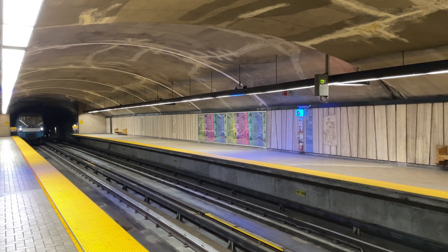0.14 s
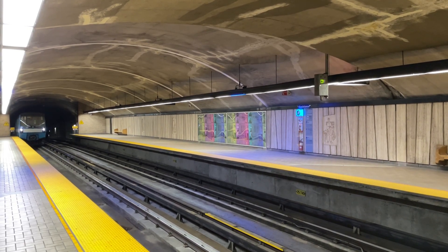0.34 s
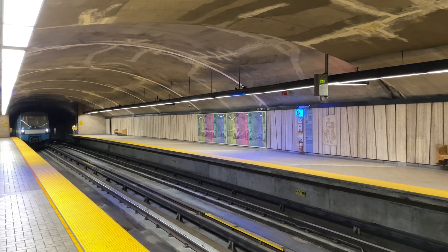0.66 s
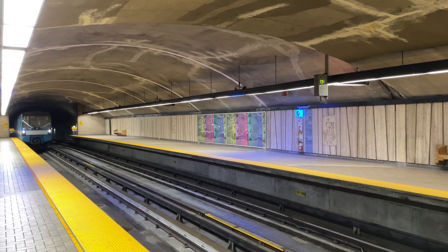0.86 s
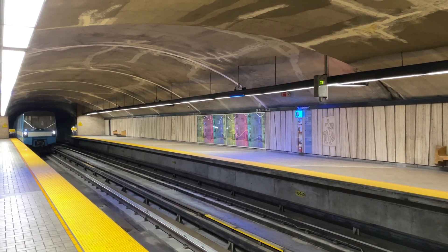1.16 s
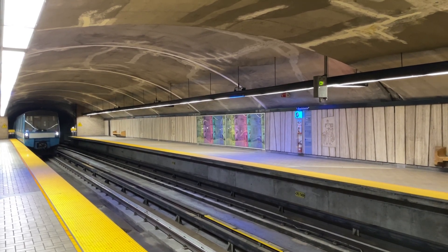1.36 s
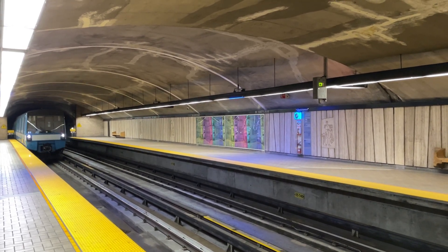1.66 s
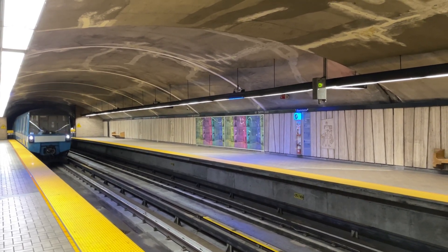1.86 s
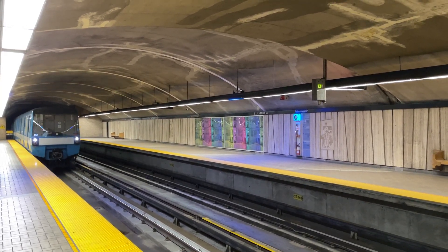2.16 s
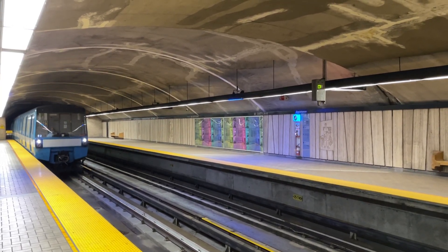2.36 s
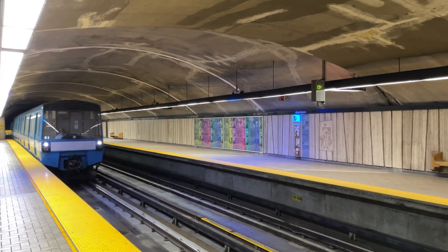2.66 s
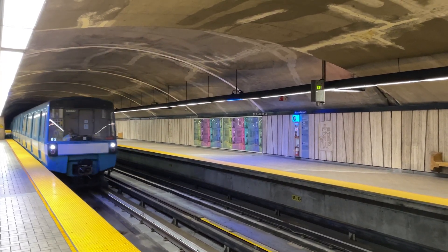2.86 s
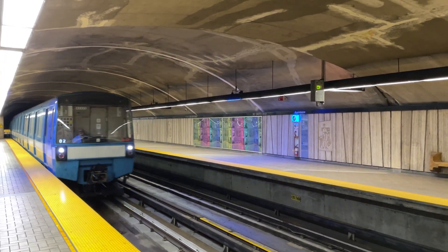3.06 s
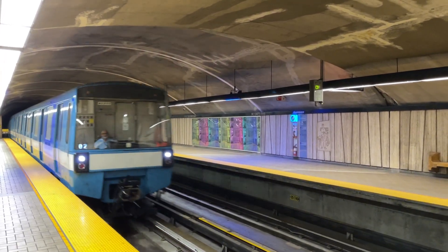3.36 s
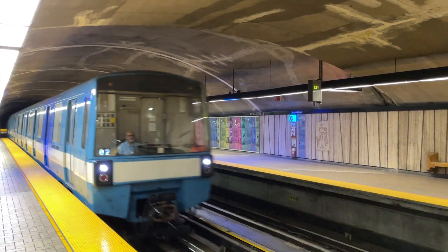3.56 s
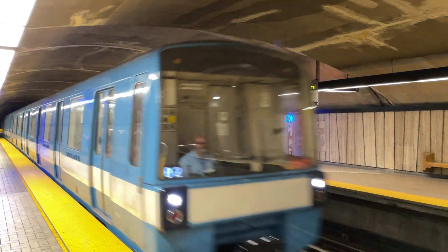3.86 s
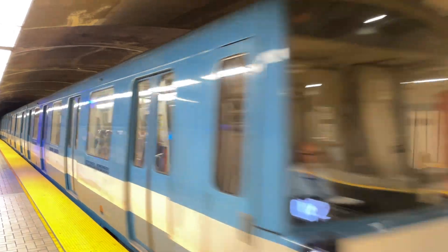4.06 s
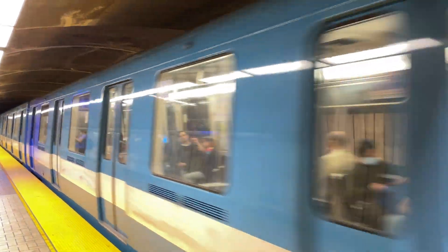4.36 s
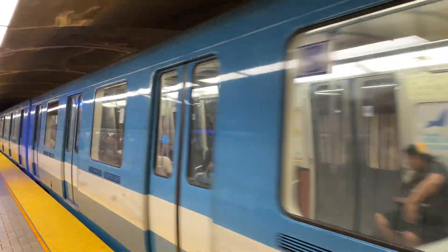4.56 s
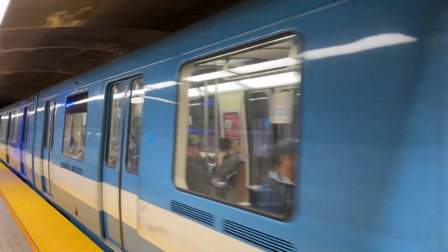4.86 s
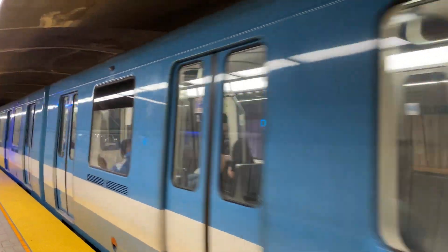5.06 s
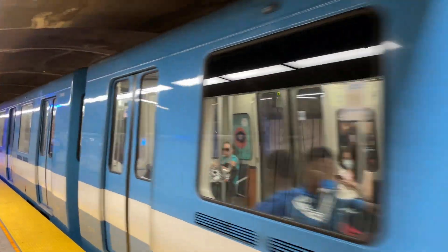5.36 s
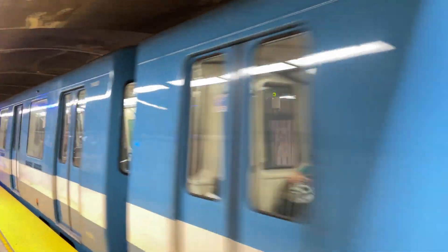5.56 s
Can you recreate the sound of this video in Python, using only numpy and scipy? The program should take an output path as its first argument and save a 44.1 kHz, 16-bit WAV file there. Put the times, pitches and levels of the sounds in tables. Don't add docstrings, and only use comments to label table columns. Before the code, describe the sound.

An underground station with a hard concrete vault, heard from a stereo microphone on the platform. From 0 s a deep ground rumble and a wide, rough tyre roar come from the tunnel mouth, already loud, with soft tonal hums blurred inside the noise. Over the first two seconds the roar opens up slightly as the train leaves the tunnel, while tread hiss and a thin, high scraping sizzle grow with nearness. At about 4 s the front draws level: car sides slightly dull the running gear, the low part widens, and sparse tiny bright snaps begin. Bogies and gaps pass with gentle swells near 4.5, 5.3 and 5.55 s. Low wind buffets hit the microphone: a longer one around 5 s, three short hard thumps between 5.25 and 5.45 s, a weak one near 5.65 s. The roar continues to the end, with no squeal or stop.

```python
import sys
import numpy as np
from scipy import signal
from scipy.fft import rfft, irfft, next_fast_len
from scipy.io import wavfile
from scipy.ndimage import uniform_filter1d

SR = 44100
rng = np.random.default_rng(int(sys.argv[2]) if len(sys.argv) > 2 else 0)


def undo_db(level):
    steps = np.asarray(level, float) / 20
    return 10 ** steps


def to_wav(sig):
    pcm = np.clip(np.atleast_2d(sig), -1, 1) * 32767
    pcm = np.round(pcm).astype(np.int16)
    wavfile.write(sys.argv[1], SR, pcm.T)


N = 251811
SIZE = next_fast_len(N)
TIME = np.arange(N) / SR
START_M, LEVEL_S = 62, 3.96


def approach():
    leave_s, cover_s = 0.66, 0.12
    metres = START_M * np.maximum(1 - TIME / LEVEL_S, 0)
    inside = np.exp(-TIME / leave_s)
    hidden = 0.5 + 0.5 * np.tanh((TIME - LEVEL_S) / cover_s)
    return metres, inside, hidden


def heard_db(level_db, mouth_db, air_db, screen_db, column):
    # middle in seconds, length in seconds,
    # gain of low sound (column 2) in dB, gain of high sound (column 3) in dB.
    openings = [
        (4.497, 0.2, 0.6, 0.3),
        (5.303, 0.11, 1, 0.5),
        (5.555, 0.13, .5, 0.7),
    ]
    metres, inside, hidden = approach()
    through_db = sum(row[column] * np.exp(-((TIME - row[0]) / row[1]) ** 2) for row in openings)
    return level_db - mouth_db * inside - air_db * metres / 100 - screen_db * hidden + through_db


def rms_one(x):
    return x / np.sqrt(np.mean(x ** 2) + 1e-20)


def at_hz(points, column=1, scale=np.log):
    points = np.array(points)
    hz = np.maximum(np.arange(SIZE // 2 + 1) * SR / SIZE, 1)
    return np.interp(scale(hz), scale(points[:, 0]), points[:, column])


def slow_noise(noise, pole):
    return signal.lfilter([1], [1, -2 * pole, pole * pole], noise)[..., 2000:]


def drift(rate):
    pole = np.exp(-80 * np.pi * rate / SR)
    slow = slow_noise(rng.standard_normal(N // 40 + 2002), pole)
    return np.interp(np.arange(N) / 40, np.arange(len(slow)), rms_one(slow))


def field(spectrum, flicker_db, rate):
    closed = [*spectrum, (2 * spectrum[-1][0], -140)]
    gain = undo_db(at_hz(closed))
    gain[0] = 0
    white = rfft(rng.standard_normal((2, SIZE)))
    coloured = irfft(gain * white, SIZE)[:, :N]
    return rms_one(coloured) * undo_db(flicker_db * drift(rate))


def ground_rumble():
    # frequency in Hz, density in dB per Hz.
    ground_colour = [(11, -49), (18, -31), (65, -0.5), (160, -2), (210, -20), (350, -120)]
    ground_db = heard_db(-27, mouth_db=-3.5, air_db=3, screen_db=-0.1, column=2)
    return undo_db(ground_db + 0.6) * field(ground_colour, flicker_db=1.7, rate=6.3)


def carcass_roar(roar_db):
    # frequency in Hz, density in dB per Hz.
    carcass_colour = [(70, -26), (120, -3), (200, -3.5), (320, -3.5), (480, -3), (620, -8), (900, -39)]
    return undo_db(roar_db - 2.5) * field(carcass_colour, flicker_db=0.3, rate=2.3)


def tread_roar(tread_db):
    # frequency in Hz, density in dB per Hz.
    tread_colour = [(380, -41), (540, -4), (650, -1.5), (900, -0.5), (1400, -5), (2000, -10.5),
                    (2600, -19.5), (3600, -69)]
    return undo_db(tread_db - 2.0) * field(tread_colour, flicker_db=0.56, rate=4.2)


def tyre_resonances(roar_db, tread_db):
    # first pitch in Hz, last pitch in Hz, width in Hz, level far off in dB, level alongside in dB.
    resonances = [(135.2, 125, 56, -35, -46), (179.2, 150, 38, -25.5, -54), (267.5, 252, 47, -27, -27.5),
                  (392.3, 355, 43, -25, -32), (446.6, 470, 66, -26.5, -34), (661.5, 640, 30, -36, -32.5),
                  (736.4, 725, 49, -27.5, -29.5), (871, 800, 107, -31.5, -33),
                  (961, 1090, 120, -40.5, -34.5), (1360, 1400, 134, -35.5, -39),
                  (1696, 1800, 260, -39.5, -37)]
    out = np.zeros((2, N))
    remoteness = approach()[0] / START_M
    for first_hz, last_hz, width_hz, far_db, near_db in resonances:
        noise = rng.standard_normal((2, N + 2000)) + 1j * rng.standard_normal((2, N + 2000))
        sway = slow_noise(noise, np.exp(-1.55 * np.pi * width_hz / SR))
        carrier = np.exp(2j * np.pi * np.cumsum(np.linspace(first_hz, last_hz, N)) / SR)
        swell_db = roar_db if first_hz < 560 else tread_db
        waver_db = 1.0 * drift(1.8)
        own_db = near_db + (far_db - near_db) * remoteness + waver_db
        out += undo_db(swell_db + 21 + own_db) * rms_one((sway * carrier).real)
    return out


def tread_hiss():
    # frequency in Hz, density in dB per Hz.
    hiss_colour = [(1400, -23.5), (2200, 0.5), (3000, -1), (4000, -5.5), (5200, -7), (6200, -13),
                   (7500, -19.5)]
    hiss_db = heard_db(-31.5, mouth_db=3, air_db=-1.1, screen_db=1.1, column=3)
    return undo_db(hiss_db - 0.3) * field(hiss_colour, flicker_db=0.38, rate=9.9)


def shoe_sizzle():
    # frequency in Hz, density in dB per Hz.
    scrape_colour = [(4500, -22), (6200, 2.5), (8000, 0.5), (9000, 0), (10500, -5.5), (12500, -19.5),
                     (15500, -22), (16500, -40)]
    # frequency in Hz, density in dB per Hz.
    top_colour = [(8500, -20), (10500, -1), (12000, -3), (13500, -4.5), (14700, -2.5), (15600, -.5),
                  (16200, -12)]
    sizzle_db = heard_db(-44.5, mouth_db=3, air_db=9.5, screen_db=1.3, column=3)
    top_db = -57.0 + 1.9 * (sizzle_db + 46)
    scrape = undo_db(sizzle_db + 1.3) * field(scrape_colour, flicker_db=0.5, rate=6.4)
    return scrape + undo_db(top_db) * field(top_colour, flicker_db=0.7, rate=4.0)


def shoe_ticks():
    ticks_per_s, tick_db, low_hz = 14, -37, 7000
    born = rng.random(N) < ticks_per_s * approach()[2] / SR
    size_db = tick_db + 3.5 * np.minimum(rng.exponential(1, N), 3)
    snaps = born * undo_db(size_db) * rng.choice([-1, 1], N)
    bright = signal.butter(4, low_hz, "high", fs=SR, output="sos")
    return signal.sosfilt(bright, snaps + 1e-18) * [[1], [0]]


def draught():
    # middle in seconds, time held in seconds, level in dB.
    gusts = [
        (4.98, .07, -26),
        (5.26, .012, -23),
        (5.37, .012, -22),
        (5.455, .012, -23),
        (5.65, 0.073, -32),
    ]
    fall_db_per_s = 350
    wake_db, wake_db_per_s, still_db = -38, 7, -62
    colour = [(15, -8), (30, -6), (75, 4), (140, -8), (300, -26), (600, -60)]   # (Hz, dB per Hz)
    puff = field(colour, flicker_db=-3.0, rate=15.0)
    even = np.sqrt(uniform_filter1d(puff ** 2, size=2200, axis=1) + 0.05)
    wind_db = np.where(TIME > LEVEL_S, wake_db - wake_db_per_s * (N / SR - TIME), still_db)
    for middle_s, held_s, db in gusts:
        outside_s = np.maximum(np.abs(TIME - middle_s) - held_s / 2, 0)
        wind_db = np.maximum(wind_db, db - fall_db_per_s * outside_s)
    return puff / even * undo_db(wind_db)


def ports(shared, apart):
    # frequency in Hz, likeness 0-1, right port's lead in turns,
    # left minus right in dB.
    port_pair = [(40, 0.99, -0.0099, 0), (170, 1, -0.065, -1), (400, 0.73, 0.0023, 0.4),
                 (700, 0.43, -0.081, 2), (1220, 0.56, -0.08, 1.3), (1710, 0.3, -0.019, 1.5),
                 (2800, 0.4, 0.066, 3.5), (3440, 0.36, -0.027, 3), (4270, 0.77, -0.07, 4),
                 (5160, 0.83, -0.21, 4.5), (5900, 0.67, 0.012, 3), (7990, 1, 0.488, 0.1),
                 (11740, 1, 1.04, -0.5), (15000, 0.74, 1.55, 0)]
    alike = np.clip(at_hz(port_pair, column=1), 0, 1)
    shared = np.sqrt(1 + alike) * rfft(shared, SIZE)
    apart = np.sqrt(1 - alike) * rfft(apart, SIZE)
    lean = undo_db(at_hz(port_pair, column=3) / 2)
    turns = at_hz(port_pair, column=2, scale=np.abs)
    left = (shared + apart) * lean
    right = (shared - apart) / lean * np.exp(2j * np.pi * turns)
    return irfft(np.array([left, right]), SIZE)[:, :N] / np.sqrt(2)


def scene():
    roar_db = heard_db(-18.5, mouth_db=3, air_db=-0.6, screen_db=2.1, column=2)
    tread_db = heard_db(-19.5, mouth_db=1.3, air_db=-0.9, screen_db=2, column=2)
    low = ground_rumble() + carcass_roar(roar_db) + tread_roar(tread_db)
    low += tyre_resonances(roar_db - 1.0, tread_db - 1.0)
    low[1] *= undo_db(0.8 + 1.1 * approach()[2])
    high = tread_hiss() + shoe_sizzle() + shoe_ticks()
    shared, apart = low + high
    return ports(shared, apart) + draught()


def top_cut(x):
    return signal.sosfilt(signal.butter(12, 15790, fs=SR, output="sos"), x)


def record(dry):
    low_cut = signal.butter(3, 27, "high", fs=SR, output="sos")
    mix = signal.sosfilt(low_cut, dry)
    return top_cut(mix)


dry = scene()
out = record(dry)
to_wav(out)
```